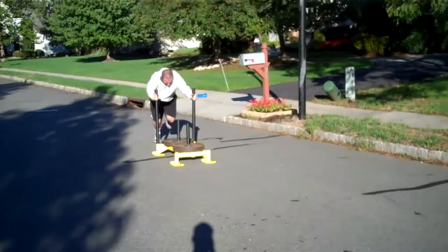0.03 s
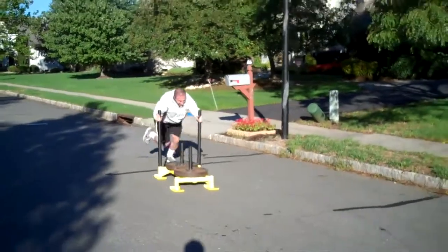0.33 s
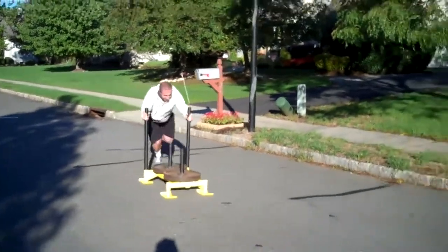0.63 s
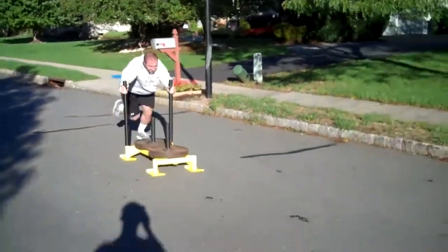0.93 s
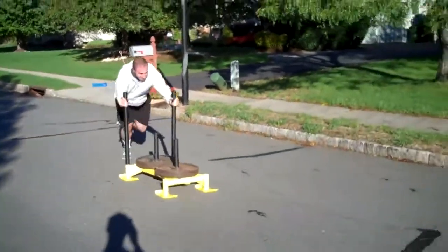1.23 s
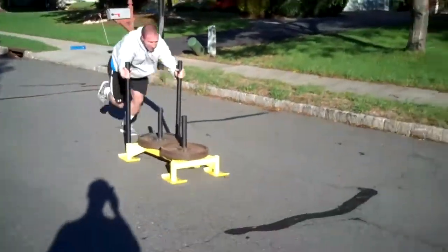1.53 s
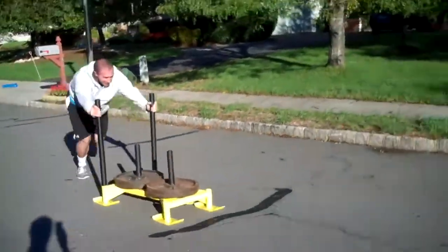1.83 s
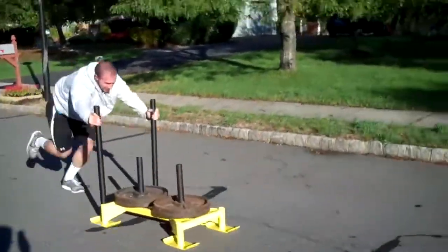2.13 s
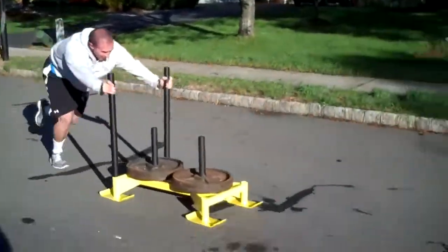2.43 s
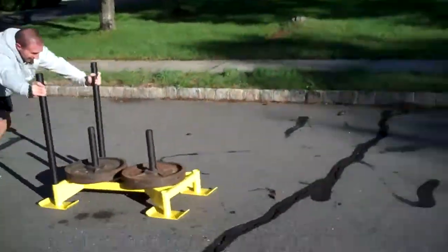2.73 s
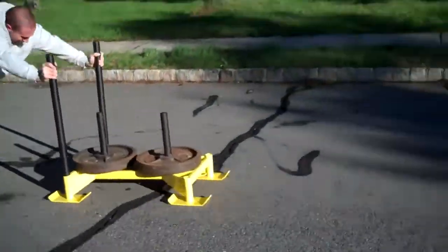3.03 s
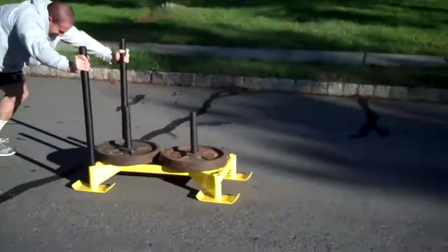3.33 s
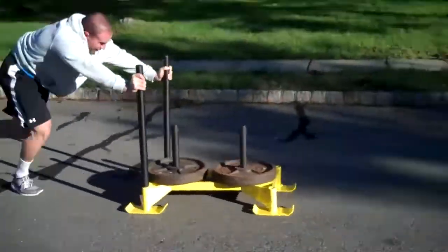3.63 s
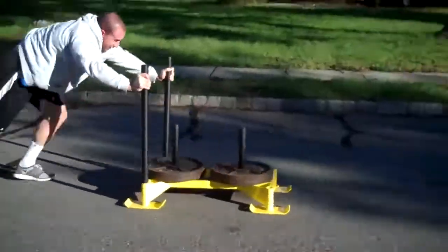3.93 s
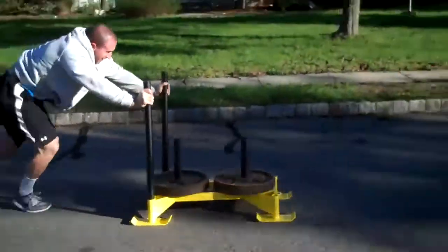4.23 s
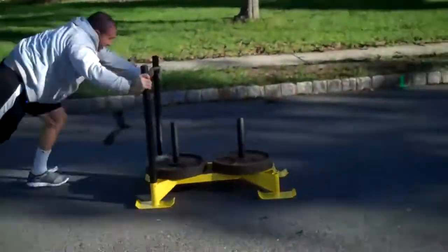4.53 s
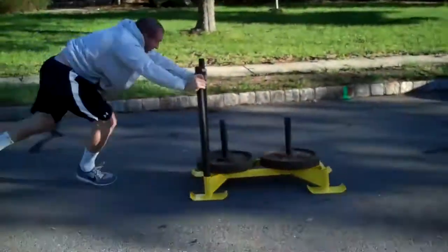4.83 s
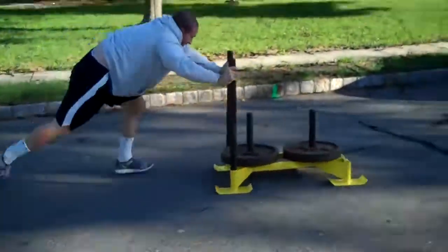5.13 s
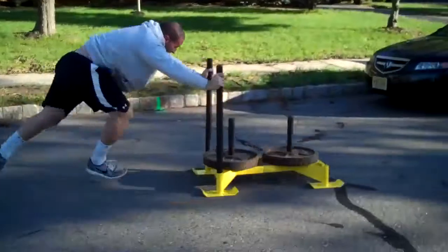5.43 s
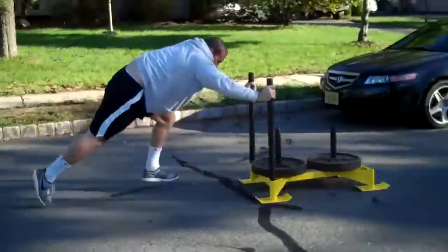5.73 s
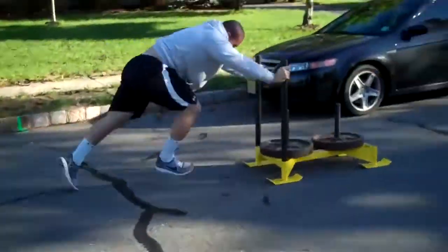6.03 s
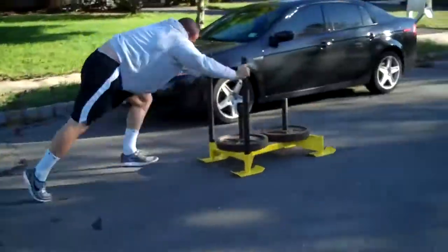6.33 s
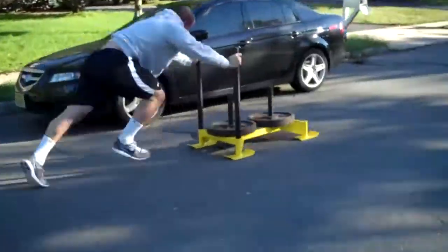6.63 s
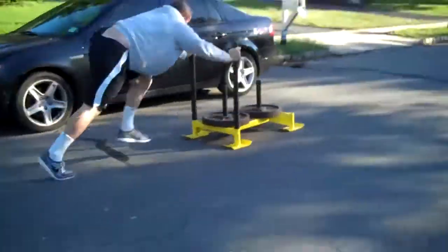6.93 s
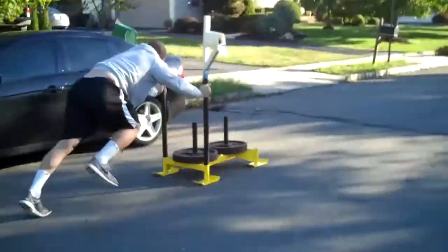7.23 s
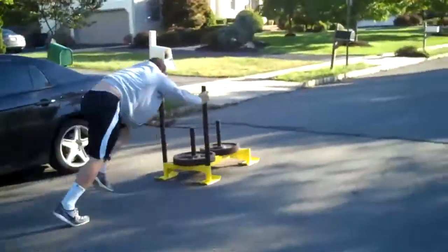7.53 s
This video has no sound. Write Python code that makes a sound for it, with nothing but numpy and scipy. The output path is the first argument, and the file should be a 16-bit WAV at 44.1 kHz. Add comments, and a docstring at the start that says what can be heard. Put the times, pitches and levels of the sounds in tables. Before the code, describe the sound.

Loud, gritty scraping runs throughout as a steel sled loaded with plates slides along a quiet street. The metallic grind pulses with the strides, catches on stones and squeals briefly, growing fuller as it passes near the stereo microphone. Finally a bright squeak and a short clank of plates almost stop it, then the scraping resumes. A low, faraway hum is barely audible underneath.

```python
"""Weighted sled on asphalt

A steel sled loaded with plates is pushed along a street, close past a small camera's stereo microphone.
Four skids grind over the stones and ring the frame, surging with each stride, catching and squealing.
At the end a skid snags with a squeak, the plates clank, and the sled nearly stops, then slides on.
Behind it lie quiet outdoor air and a faint, distant hum."""
import sys
import numpy as np
from scipy import signal
from scipy.fft import rfft, irfft, next_fast_len
from scipy.io import wavfile
from scipy.ndimage import uniform_filter1d, minimum_filter1d, map_coordinates

SR = 44100
rng = np.random.default_rng(int(sys.argv[2]) if len(sys.argv) > 2 else 0)


def to_wav(sig):
    """Store sig (one row per channel, or 1-D mono) as 16-bit WAV at the path in sys.argv[1].

    Samples outside -1..1 are clipped; the rate is SR.
    """
    pcm = np.clip(np.atleast_2d(sig), -1, 1) * 32767
    pcm = np.round(pcm).astype(np.int16)
    wavfile.write(sys.argv[1], SR, pcm.T)  # frames by channels


N = 339570
TIME = np.arange(N) / SR
FFT_SIZE = next_fast_len(N + SR // 2, True)
HZ = np.fft.rfftfreq(FFT_SIZE, 1 / SR)

# the sled's modes over the scrape: (pitch [Hz], width [Hz], end-on [dB], at a slant [dB], broadside [dB])
FRAME_MODES = [(422, 11, 4, 12, 6.5), (497.8, 27, 11, 16, 10), (578, 40, 3, 5, 10.5), (616, 21, -14, 5, 4),
               (711, 21, 5, 19.5, 18.5), (748, 52, 8.5, 10, 11.5), (988, 11.4, 16.5, -2, 1),
               (1072, 38, 11.5, 8, 14), (1315, 20, -20, -17, 7), (1491, 17, 10.5, 3, -2),
               (1608, 33, 8, 12.5, 4), (1680, 33, 10.5, 7.5, 8), (1835, 48, 12.5, 6.5, 5.5),
               (2170, 110, 9, 7, 7.5), (2359, 45, 15, 8, 8), (2516, 75, 10.5, 9.5, 5.5),
               (2696, 45, 9, 1, 5.5), (2939, 100, 14, 12, 10), (3240, 100, 7, 11, 0),
               (3540, 55, 11.5, 13, 7), (4075, 90, 8.5, 7, 11.5), (4500, 115, 10.5, 10, 10),
               (4750, 63, 11, 5.5, 12), (6003, 364, 8, 5.5, 13), (6400, 285.0, 0.5, 2, 6.5),
               (7250, 290, 11, 8, 8.0), (7700, 100, 10, 4, 8.0), (8103, 32, 11, 16, 11),
               (8660, 150, 9.5, 8.5, 7), (9900, 69, 1, 5, -4)]
# the broad scrape between the modes: (frequency [Hz], relative level [dB])
SCRAPE_SPECTRUM = [(110.0, -28.5), (150.0, -14.5), (200.0, 2), (250.0, 2.5), (370.0, -13.5), (600.0, -5),
                   (900.0, -11.5), (1300.0, -6), (2400.0, -7), (5200.0, -10.5), (6500.0, -8.5),
                   (8000.0, -13), (9300.0, -20.5), (14000.0, -28.5)]
# each shove makes the skids bite: (start [s], length [s], bite over plain sliding [dB])
STRIDES = [(0.042, 0.21, 4.5), (0.332, 0.07, 6), (0.467, 0.379, 5.5), (0.895, 0.098, 4.5),
           (1.024, 0.39, 4.5), (1.45, 0.23, 2), (1.764, 0.28, 5), (2.113, 0.2, 4), (2.352, 0.092, 4),
           (2.522, 0.184, 6.0), (2.79, 0.057, 4.5), (2.961, 0.13, 6.5), (3.161, 0.22, 4),
           (3.531, 0.25, 5.5), (3.853, 0.14, 5.5), (4.077, 0.398, 4.0), (4.533, 0.15, 6.0),
           (4.735, 0.069, 5.5), (4.868, 0.113, 5.0), (5.03, 0.14, 3.5), (5.181, 0.045, 5.5),
           (5.301, 0.096, 4.5), (5.443, 0.2, 5.0), (5.695, 0.093, 4.0), (5.836, 0.221, 7), (6.116, 0.2, 5),
           (6.366, 0.17, 6.5), (6.604, 0.027, 6), (6.696, 0.2, 6.5), (6.985, 0.323, 2.5),
           (7.333, 0.029, 6.5), (7.6, 0.043, 2)]
# base levels as the sled passes: (time [s], frame boom [dB], skid plate [dB], frame ring [dB])
PASS_LEVELS = [(0, -40.5, -34, -22.4), (.95, -37.6, -32, -20.4), (1.7, -34, -31.2, -22.6),
               (2.15, -33.6, -31.6, -23.2), (2.5, -30, -31, -23.1), (2.9, -30.5, -25.7, -24.2),
               (3.7, -31, -25.2, -24.5), (5.05, -31, -23.5, -22.8), (6.3, -32.5, -27.8, -24.3),
               (7.2, -35, -27, -20.5), (7.7, -35.5, -30, -24)]
# a skid catches on a stone: (time [s], frame ring [dB], grit [dB])
STONE_CATCHES = [(.363, -18, -21), (.944, -9.5, -19), (1.417, -20, -14), (1.908, -17, -13),
                 (2.147, -16, -17), (2.172, -18, -9), (2.187, -20, -15), (2.587, -28, -8),
                 (2.797, -14, -15), (3.293, -15, -4.5), (3.557, -10, -3.5), (3.94, -17, -11),
                 (3.99, -8, -13), (4.006, -9, -11), (4.019, -17, -9), (4.668, -15, -13), (4.921, -22, -8),
                 (5.225, -10, -9.5), (6.275, -13, -6)]
# how the sled faces the microphone, the rest being broadside: (time [s], end-on [share], slant [share])
SLED_FACING = [(0, 1, 0), (1.3, 1, 0), (1.9, 0.13, .9), (3.2, 0, 0.6), (3.8, 0.05, 0.05), (6.3, 0, 0.12),
               (7.2, 0.7, 0.031), (7.7, 0.75, 0)]
# at close range the bounce off the road hollows the middle: (time [s], centre [Hz], depth [dB])
ROAD_DIP = [(1.4, 1400, 0), (2.3, 1360, 4), (2.55, 1310, 1), (2.7, 950, 13), (3.3, 1015, 10),
            (3.7, 960, 5.5), (5.5, 990, 4), (5.9, 1080, 10), (6.4, 1010, 9)]
# the air of the street: (frequency [Hz], relative level [dB])
AIR_SPECTRUM = [(20, -12), (60, -2.5), (120, -3.5), (400, 0), (2000, -2.5), (14000, -36)]
# the hum in the distance: (time [s], level [dB])
HUM_LEVELS = [(0, -56.5), (1, -56), (1.5, -59.5), (7.7, -60)]
# brief skid squeals: (peak time [s], pitch [Hz], rms at the peak [dB], time to fall 12 dB [s])
SKID_SQUEALS = [(0.367, 2950, -20, 0.014), (0.859, 2335, -21.5, .05), (0.947, 3170, -19, .012),
                (1.092, 7110, -20, 0.15), (1.4, 1063, -28.5, 0.14), (1.488, 2410, -22, .04),
                (1.641, 3580, -24, .015), (1.838, 3520, -24, .02), (1.942, 3650, -23, 0.028),
                (2.18, 3560, -15, .018), (2.189, 3000, -17, .01), (2.408, 6180, -22, .03),
                (4.925, 5870, -22, .025), (5.62, 5890, -22, .05), (6.036, 2670, -22.5, 0.047),
                (7.02, 7800, -23, 0.024), (7.088, 3060, -24, 0.033)]
# the rasp of the snagging skid: (frequency [Hz], relative level [dB])
RASP_SPECTRUM = [(300, -58), (2500, -20), (3900, -15), (4500, -1), (5400, -12), (6300, 1), (6900, 6),
                 (7600, 0), (8500, -11), (14000, -25)]
# the weight plates strike the frame: (time [s], level [dB], t60 [s])
PLATE_STRIKES = [(7.436, -2, 0.078), (7.447, -10, 0.059), (7.472, -19, 0.043)]
# the force of a plate's blow: (frequency [Hz], relative level [dB])
BLOW_SPECTRUM = [(60, -10), (300, -8), (600, -8), (1300, -3.5), (2200, 2.5), (3800, -5.5), (5000, -4),
                 (8000, -7), (13000, -5)]
# balance of the two microphone ports: (frequency [Hz], left over right [dB])
MIC_BALANCE = [(1000, -0.5), (3500, -0.1), (4600, -2), (5500, -6), (6000, -5.5), (6550, 1), (7300, 17),
               (8000, 14.5), (10500, 11.5), (12000, 17), (14000, 32)]
# phase between the ports: (frequency [Hz], left lead [rad])
MIC_PHASE = [(400, 0.053), (3500, 0.15), (4750, -0.34), (5400, -0.02), (6500, 1.38), (7200, .9),
             (8000, -.35), (9000, -.9), (13000, -0.96)]
# how alike the ports sound: (frequency [Hz], coherence [0 to 1])
MIC_COHERENCE = [(200, .995), (2000, .99), (3000, .955), (4500, .89), (5500, .8), (6000, .83), (8500, .58),
                 (9300, .37), (11000, .3), (14000, .08)]


def amp(db):
    """Decibels to gain."""
    return 10 ** (np.asarray(db) / 20)


def unit(x):
    """x at rms 1."""
    return x / np.sqrt(np.mean(x ** 2) + 1e-20)


def over_hz(points):
    """(Hz, value) points joined on a log frequency axis."""
    hz, values = np.transpose(points)
    return np.interp(np.log(HZ + 1), np.log(hz + 1), values)


def over_time(rows):
    """One value per sample for each column after the time."""
    times, *columns = np.transpose(rows)
    return [np.interp(TIME, times, column) for column in columns]


def wobble(rate):
    """A smooth random curve, rate knots a second."""
    return map_coordinates(rng.standard_normal(int(N * rate / SR) + 4), [TIME * rate])


def filtered(x, response):
    """x through a frequency response."""
    return irfft(rfft(x, FFT_SIZE) * response, FFT_SIZE)[..., :N]


def causal(gain):
    """A response of this shape that rings only after a blow; it keeps the power of white noise."""
    cepstrum = irfft(np.log(np.maximum(unit(gain), 1e-6)), FFT_SIZE)
    cepstrum[1:FFT_SIZE // 2] *= 2
    cepstrum[FFT_SIZE // 2 + 1:] = 0
    return np.exp(rfft(cepstrum))


def band(lo_hz, hi_hz, order=10):
    """A band-pass gain, steep by default."""
    return ((1 + (lo_hz / (HZ + 1)) ** (2 * order)) * (1 + (HZ / hi_hz) ** (2 * order))) ** -.5


def burst(start, t60, attack):
    """An envelope that rises at start and dies away; times in seconds."""
    envelope = np.zeros(N)
    live = (TIME > start) & (TIME < start + 2 * t60)
    age = TIME[live] - start
    envelope[live] = (1 - np.exp(-age / attack)) * amp(-60 * age / t60)
    return envelope


def swell(start, length, attack, release):
    """An envelope that rises, holds at 1 and falls once the length is over; times in seconds."""
    return np.clip(np.minimum((TIME - start) / attack, 1 - (TIME - start - length) / release), 0, 1)


def frame_resonances():
    """The steel's modes over the broad scrape, heard end-on, at a slant and broadside."""
    hz, width, *heard_db = np.transpose(FRAME_MODES)
    peaks = 1 / (1 + (2 * (HZ - hz[:, None]) / width[:, None]) ** 2)
    return amp(over_hz(SCRAPE_SPECTRUM)) * np.sqrt(1 + amp(heard_db) ** 2 @ peaks)


def sliding_strengths():
    """Boom, plate, ring and grit: shoves lift the upper three, stones jolt the top two, a stall dips all."""
    bites = [db * swell(start, length, attack=.03, release=.067) for start, length, db in STRIDES]
    bite_db = np.max(bites, axis=0)
    stall_db = 9.5 * swell(start=7.465, length=.12, attack=.031, release=.031)
    judder_db = .56 * wobble(32)
    distance_db = 2.5 * np.clip(1 - TIME / 1.4, 0, 1)  # less grit until the sled has come near
    boom_db, plate_db, ring_db = over_time(PASS_LEVELS)
    boom = amp(boom_db - .5 * stall_db + 1.26 * wobble(12))
    plate = amp(plate_db + .26 * bite_db - .5 * stall_db + 1.26 * wobble(12))
    ring = amp(ring_db + .7 * (bite_db + judder_db) - stall_db)
    grit = amp(-22 - distance_db + bite_db + judder_db - stall_db + .55 * wobble(40))
    for start, catch_ring_db, catch_grit_db in STONE_CATCHES:
        jolt = burst(start, t60=.068, attack=.002)
        ring = np.hypot(ring, amp(catch_ring_db) * jolt)
        grit = np.hypot(grit, amp(catch_grit_db) * jolt)
    return boom, plate, ring, grit


def edge_pings(per_s, t60, spread_db, lo_hz, hi_hz):
    """Single stones pluck the skid edges, each at its own pitch."""
    when, pitch, size = rng.random((int(per_s * N / SR), 3)).T
    age = TIME[:SR // 40]
    hz = lo_hz * (hi_hz / lo_hz) ** pitch
    gain = amp(spread_db * np.minimum(-np.log(1 - size), 4))
    rings = gain[:, None] * np.sin(2 * np.pi * hz[:, None] * age) * amp(-60 * age / t60)
    index = (when * N).astype(int)[:, None] + np.arange(len(age))
    return unit(np.bincount(index.ravel(), rings.ravel(), N)[:N])


def stone_force(per_s, spread_db, fine_db):
    """Tiny blows of uneven size from the stones, on the rub of fine grit."""
    struck = rng.random(N) < per_s / SR
    sizes = amp(spread_db * np.minimum(rng.exponential(size=N), 4))
    blows = unit(struck * sizes * np.sign(rng.standard_normal(N)))
    return unit(blows + amp(fine_db) * rng.standard_normal(N))


def tube_ring(t60):
    """The response of the frame's tubes: the direct sound plus many weak, narrow modes that ring on."""
    age = TIME[:SR // 2]
    tail = rng.standard_normal(len(age)) * amp(-60 * age / t60)
    modes = rfft(tail / np.linalg.norm(tail), FFT_SIZE)
    strength = amp(-10.5) * band(850, 11000, order=1)
    return (1 + strength * modes) / np.hypot(1, strength)


def passing_colour(x, flicker_db, dip_width_hz):
    """As the sled moves, different partials stand out and the road's bounce cuts a wandering dip."""
    hz, times, spectra = signal.stft(x, SR, nperseg=1024)
    field = uniform_filter1d(rng.standard_normal(spectra.shape), size=2, axis=0)
    field = unit(uniform_filter1d(field, size=14, axis=1))
    flicker = amp(flicker_db * field * np.clip(hz / 1300, 0, 1)[:, None])
    flicker /= np.sqrt(np.mean(flicker ** 2, axis=1, keepdims=True))
    when, centres, depths = np.transpose(ROAD_DIP)
    offset_hz = hz[:, None] - np.interp(times, when, centres)
    dip_db = np.interp(times, when, depths) * np.exp(-(offset_hz / dip_width_hz) ** 2)
    return signal.istft(spectra * flicker * amp(-dip_db), nperseg=1024)[1][:N]


def grinding_skids(resonances):
    """The stones drive the frame, which shows the microphone its end, its side, then its end again."""
    boom, plate, ring, grit = sliding_strengths()
    pings = amp(-11.5) * edge_pings(per_s=600, t60=.025, spread_db=3, lo_hz=2198, hi_hz=13080)
    force = stone_force(per_s=3800, spread_db=2.65, fine_db=-1) + pings
    force *= unit(amp(.51 * wobble(45) + .37 * wobble(170)))
    # the heavy low modes gather the rub of all four skids; the high ones follow single stones
    rub = stone_force(per_s=3000, spread_db=2, fine_db=.5)
    registers = [(boom * rub, band(121, 401)), (plate * rub, band(380.6, 1036)),
                 (ring * force, band(1000, 3376)), (grit * force, band(3470, 18100))]
    end_on, slant = np.clip(over_time(SLED_FACING), 0, 1)
    broadside = np.clip(1 - end_on - slant, 0, 1)
    spectrum = 0
    for share, resonance in zip((end_on, slant, broadside), resonances):
        for drive, region in registers:
            spectrum += rfft(drive * share, FFT_SIZE) * causal(resonance * region)
    grind = irfft(spectrum * tube_ring(t60=.16), FFT_SIZE)[:N]
    return passing_colour(grind, flicker_db=2.9, dip_width_hz=130)


def street(air_db, hum_hz, hum_width_hz):
    """Quiet outdoor air all round, and a faint, wavering hum like a distant engine."""
    wide_noise = rng.standard_normal((2, N)) + rng.standard_normal(N) / 2
    air = filtered(wide_noise, amp(over_hz(AIR_SPECTRUM)))
    hum = filtered(rng.standard_normal(N), 1 / (1 + ((HZ - hum_hz) / hum_width_hz) ** 2))
    return amp(air_db) * unit(air) + amp(over_time(HUM_LEVELS)[0]) * unit(hum)


def skid_squeal(peak_s, hz, db, fade_s, rise_per_s=0, rough=.006):
    """A skid sticks and slips: one unsteady partial swells and fades. Rise and rough are shares of hz."""
    sound = np.zeros(N)
    live = np.abs(TIME - peak_s) < 2 * fade_s
    age = TIME[live] - peak_s
    waver = rough * unit(uniform_filter1d(rng.standard_normal(len(age)), size=64))
    phase = 2 * np.pi * np.cumsum(hz * (1 + rise_per_s * age + waver)) / SR
    sound[live] = amp(db - 12 * (age / fade_s) ** 2) * np.sqrt(2) * np.sin(phase)
    return sound


def skid_snag(start_s):
    """A skid digs in with a short, bright rasp and a rising squeak."""
    friction = burst(start_s, t60=.066, attack=.0005) * rng.standard_normal(N)
    rasp = filtered(friction, causal(amp(over_hz(RASP_SPECTRUM))))
    squeak = skid_squeal(start_s + .004, hz=4420, db=-14, fade_s=.021, rise_per_s=2.2, rough=.014)
    return amp(-1) * rasp + squeak


def plate_clank(resonance):
    """The weight plates chatter against their posts, and the steel rings on."""
    chatter = sum(amp(db) * burst(start, t60, attack=.0005) for start, db, t60 in PLATE_STRIKES)
    after_ring = amp(-17.5) * burst(PLATE_STRIKES[0][0], t60=.54, attack=.005)
    force = np.hypot(chatter, after_ring) * rng.standard_normal(N)
    return filtered(force, causal(resonance * amp(over_hz(BLOW_SPECTRUM))))


def street_scatter(x):
    """The sound off the road and kerb: a little late, its phase scrambled as the sled moves."""
    spectra = signal.stft(x, nperseg=512)[2]
    scramble = np.exp(2j * np.pi * rng.random(spectra.shape))
    echo = signal.istft(spectra * scramble, nperseg=512)[1]
    late = np.pad(echo, (SR // 170, 0))[:N]
    return filtered(unit(late) * np.std(x), band(170, 20000, order=3))


def microphone_ports(x):
    """Each port has its own treble resonance; sound scattered by the street makes them differ."""
    mix_angle = np.arccos(np.clip(over_hz(MIC_COHERENCE), 0, 1)) / 2
    side = np.array([[1], [-1]])  # left, right
    balance = amp(side * over_hz(MIC_BALANCE) / 2)
    balance /= np.sqrt(np.mean(balance ** 2, axis=0))
    colour = balance * np.exp(.5j * side * over_hz(MIC_PHASE))
    direct = filtered(x, colour * np.cos(mix_angle))
    return direct + filtered(street_scatter(x), colour * side * np.sin(mix_angle))


def scene():
    """The sled passing close to the microphone, with the street behind it."""
    resonances = frame_resonances()
    sled = grinding_skids(resonances) + skid_snag(start_s=7.384) + plate_clank(resonances.mean(0))
    sled += sum(skid_squeal(*row) for row in SKID_SQUEALS)
    return microphone_ports(sled) + street(air_db=-45.8, hum_hz=84.3, hum_width_hz=6.3)


def record(dry):
    """The camera's limiter holds down peaks over full scale; nothing above 14.2 kHz is kept."""
    needed_gain = 1 / np.maximum(np.abs(dry).max(0), 1)
    smooth_gain = uniform_filter1d(minimum_filter1d(needed_gain, size=97), size=97)
    return filtered(dry * smooth_gain, HZ < 14200)


dry = scene()
out = record(dry)
to_wav(out)
```